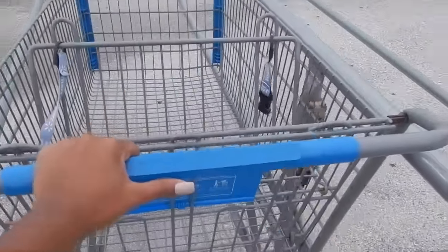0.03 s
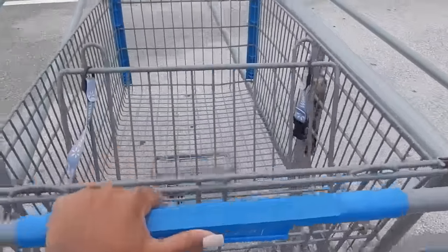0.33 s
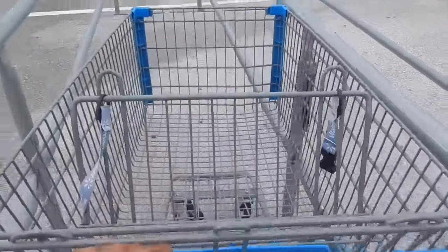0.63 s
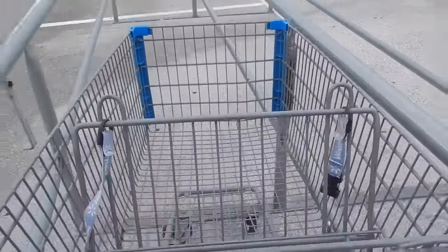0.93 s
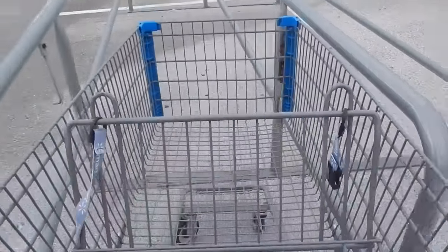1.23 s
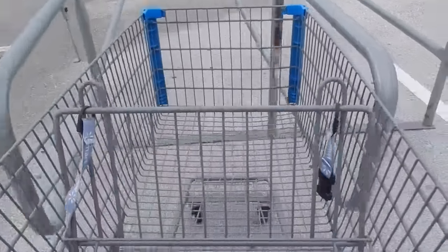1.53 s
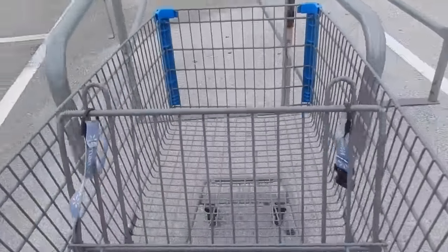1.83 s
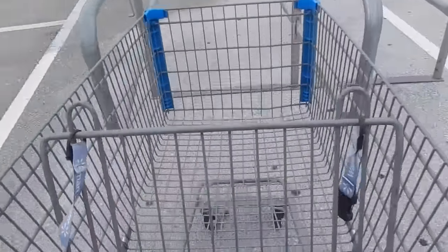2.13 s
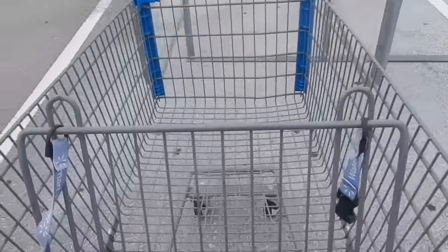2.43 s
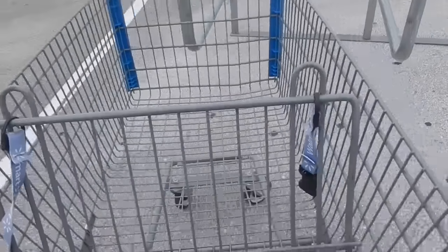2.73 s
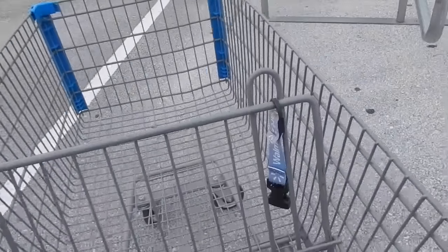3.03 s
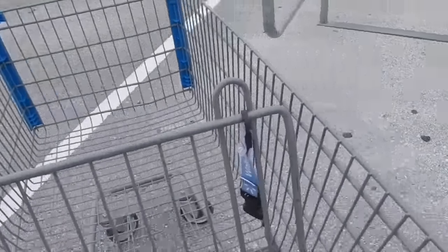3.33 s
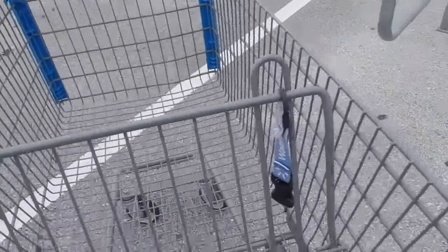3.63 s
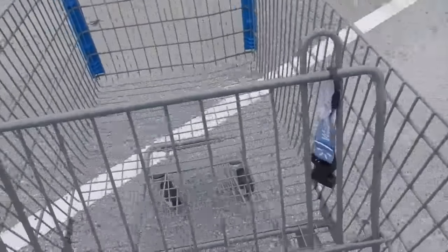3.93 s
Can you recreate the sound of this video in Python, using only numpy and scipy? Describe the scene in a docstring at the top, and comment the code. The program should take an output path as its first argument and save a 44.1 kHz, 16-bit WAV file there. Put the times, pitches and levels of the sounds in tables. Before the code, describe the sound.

An empty wire shopping cart rattles over rough paving, with a low engine throb behind it.

```python
"""A deep engine throb and the clatter of an empty wire shopping cart, pushed out of its rail in an open lot.
The wheels grind over rough paving and snap on stones; each bump shakes the basket into a dying rattle
of tiny metal contacts, and loose parts ring and clack. The throb, probably an eight-cylinder engine
nearby, is a stack of exhaust harmonics over a noisy burble: it eases off, then pulls again at lower
speed. A faint far hum comes and goes in the lull."""
import sys
import numpy as np
from scipy import signal
from scipy.fft import rfft, irfft, next_fast_len
from scipy.io import wavfile

SR = 44100
rng = np.random.default_rng(int(sys.argv[2]) if len(sys.argv) > 2 else 0)


def master(y):
    """Save y as 16-bit WAV."""
    cut = np.clip(np.atleast_2d(y).T, -1, 1)
    pcm = np.round(cut * 32767)  # scale
    wavfile.write(sys.argv[1], SR, pcm.astype(np.int16))


N = 176400


def from_db(db):
    """Decibels to gain."""
    return 10 ** (np.asarray(db) / 20)


def unit_power(x):
    """Scale to a mean square of one."""
    return x / np.sqrt(np.mean(x ** 2) + 1e-20)


def automation(rows):
    """Turn breakpoints (time_s, values...) into one curve per value column, at every sample."""
    times, *columns = np.transpose(rows)
    return [np.interp(np.arange(N) / SR, times, column) for column in columns]


def at_hz(points, hz):
    """Read a spectrum on a log-frequency axis."""
    freqs, values = np.transpose(points)
    return np.interp(np.log(hz + 1e-9), np.log(freqs), values)


def decay(t, t60):
    """Exponential fade, 60 dB down after t60 seconds."""
    return np.exp(-np.log(1000) * t / max(t60, 1e-3))


def drift(rate_hz):
    """Slow random wander with spread 1."""
    step, settle = 40, 2000
    pole = np.exp(-2 * np.pi * rate_hz * step / SR)
    noise = rng.standard_normal(N // step + settle + 2)
    slow = signal.lfilter([1], [1, -2 * pole, pole * pole], noise)[settle:]
    return np.interp(np.arange(N) / step, np.arange(len(slow)), unit_power(slow))


def eq(points, size=8192):
    """Minimum-phase impulse response of an EQ curve, falling 30 dB an octave beyond its ends."""
    hz = np.maximum(np.arange(size // 2 + 1) * SR / size, 1)
    octaves_outside = np.abs(np.log2(hz / np.clip(hz, points[0][0], points[-1][0])))
    gain = from_db(at_hz(points, hz) - np.minimum(30 * octaves_outside, 70))
    cepstrum = irfft(np.log(gain))
    cepstrum[1:size // 2] *= 2
    cepstrum[size // 2 + 1:] = 0
    return irfft(np.exp(rfft(cepstrum)))


def through(x, response):
    """Pass rows of sound through a response scaled to unit energy."""
    return signal.fftconvolve(x, response[None] / np.linalg.norm(response), axes=1)[:, :N]


def contacts(spread_db=3.5, per_s=7000):
    """Dense tiny impacts of uneven size, in two uncorrelated rows; unit power."""
    sizes = from_db(spread_db * np.minimum(rng.exponential(1, N), 4))
    hits = rng.random(N) < per_s / SR
    return unit_power(sizes * hits * rng.choice([-1, 1], (2, N)))


def add(out, start_s, sound):
    """Mix a sound in at its cue."""
    i = max(int(start_s * SR), 0)
    out[..., i:i + sound.shape[-1]] += sound[..., :N - i]


# Engine revs, in working cycles: time_s, cycle_hz
ENGINE_REVS = [(0, 16.7), (.19, 17.1), (.52, 17.3), (.76, 17.55), (.87, 17.15), (1.0, 16.1), (1.17, 14.4),
               (1.55, 13.8), (1.85, 14.9), (2.42, 15.3), (2.62, 14.3), (2.82, 13.2), (3.05, 12.75),
               (3.5, 12.8), (4.0, 12.95)]
# Engine fader: time_s, level_db
ENGINE_FADER = [(0, -14), (.15, -13), (.36, -19.5), (.68, -17.5), (.88, -21.5), (.92, -28.5), (1.17, -39),
                (1.45, -38.5), (1.72, -32), (1.86, -33.5), (2.0, -30.5), (2.37, -28), (2.45, -26.5),
                (2.71, -20.5), (3.13, -21), (3.48, -20), (3.915, -18.5), (3.935, -35), (4.0, -30.5)]
# The burble's share of the engine sound: time_s, share_db
BURBLE_SHARE = [(0, -8), (.8, -10), (1.2, 0), (2.3, -2.6), (2.9, -4), (4, -4.5)]
# Bass-heavy tone of the burble: freq_hz, gain_db
BURBLE_EQ = [(22, -14.5), (40, -16), (60, -7), (80, -2), (105, -0.5), (135, -5.5), (185, 1), (230, -10),
             (290, -11.5), (350, -14.5), (430, -26.5), (520, -30.5)]
# Balance of the exhaust harmonics, running fast and pulling slowly: cycle_multiple, fast_db, slow_db
EXHAUST_HARMONICS = [(5, -15, -10), (6, -18, -7), (8, 0, -0.5), (10, -13.5, -27), (11, -5.5, -6.5),
                     (13, -12, -3.5), (14, -9, -17.5), (16, -15.5, -10), (18, -19.5, -30), (19, -13, -25.5),
                     (20, -22, -26), (22, -30, -20.5), (24, -35, -19.5)]


def engine(wobble=0.08, wobble_hz=3.1, tone_db=-0.5, pan_db=0.86):
    """The exhaust throbs in wavering multiples of the cycle rate, the eighth strongest, over a burble."""
    cycle_hz, = automation(ENGINE_REVS)
    level_db, = automation(ENGINE_FADER)
    burble_db, = automation(BURBLE_SHARE)
    slow_mix, = automation([(0.93, 0), (1.04, 1)])  # crossfade from the fast balance to the slow one
    cycle_phase = 2 * np.pi * np.cumsum(cycle_hz) / SR
    tone, power = 0, 0
    for multiple, fast_db, slow_db in EXHAUST_HARMONICS:
        gain = from_db(fast_db + slow_mix * (slow_db - fast_db))
        phase = multiple * cycle_phase + 2 * np.pi * rng.random() + wobble * drift(wobble_hz)
        tone += gain * (1 + wobble * drift(wobble_hz)) * np.sin(phase)
        power += gain ** 2 / 2
    burble = through(rng.standard_normal((1, N)), eq(BURBLE_EQ))
    burble_gain = np.clip(from_db(burble_db), 0, 1)
    tone_gain = from_db(tone_db) * np.sqrt((1 - burble_gain ** 2) / power)
    pan = from_db([[-pan_db], [pan_db]])
    return from_db(level_db) * (tone_gain * tone + burble_gain * burble) * pan


# Fader for the wheels on the paving: time_s, level_db
WHEEL_FADER = [(0.0, -45), (0.05, -40.5), (0.38, -44.5), (0.81, -39.5), (0.82, -32), (1.01, -45),
               (1.05, -41.5), (1.15, -54.5), (1.41, -53.5), (1.67, -44.5), (2.05, -49.5), (2.08, -41.5),
               (2.32, -45.5), (2.75, -38), (3.9, -39.5), (4.0, -52)]
# Gritty midrange of the grind: freq_hz, gain_db
GRIND_EQ = [(250, -20.5), (450, 2), (700, 0.5), (1000, 0), (1500, -6), (2300, -6.5), (3500, -9),
            (7000, -53)]


def wheels(trim_db=2):
    """Grit crunches under the hard wheels."""
    level_db, = automation(WHEEL_FADER)
    return through(contacts(spread_db=1.5) * from_db(level_db + trim_db), eq(GRIND_EQ))


# Strongest resonances of the basket: pitch_hz, relative_db
BASKET_RESONANCES = [(979, -13), (1480, 8), (3481, 5), (4574, -27), (5300, -3), (6650, -3), (8042, 13.5),
                     (8554, -17), (9204, 1), (10341, -5), (10895, -10), (13324, -2)]


def panel_response(mesh_db=-3, modes_db=-57, size=8192):
    """One contact on a basket panel: a tick, the blur of many short wire modes, and a few longer ones."""
    t = np.arange(size) / SR
    tick = t == 0
    mesh = rng.standard_normal(size) * decay(t, t60=0.041)
    modes = sum(from_db(db + modes_db) * np.cos(2 * np.pi * hz * t) for hz, db in BASKET_RESONANCES)
    return tick + from_db(mesh_db) * mesh / np.linalg.norm(mesh) + modes * decay(t, t60=0.1)


def basket(shaking, panels=3, wander_hz=5, wander_db=4):
    """The shaking wanders between panels of the basket, each with a ring of its own."""
    shares = np.array([from_db(wander_db * drift(wander_hz)) for _ in range(panels)])
    limits = np.cumsum(shares, axis=0) / shares.sum(axis=0)
    struck_panel = (rng.random(N) > limits).sum(axis=0)
    return sum(through(shaking * (struck_panel == k), panel_response()) for k in range(panels))


# Bumps that shake the basket: start_s, level_db, frame_offset_db, sizzle_offset_db, decay_s
BUMP_CUES = [(0.0124, -23.5, -2, -36, 0.25), (0.0546, -12.5, -6.5, -30, 0.17),
             (0.0958, -14, -8.5, -27, 0.19), (0.14, -21.5, -14, -16.5, 0.22),
             (0.179, -20, -14.5, -16.5, 0.49), (0.2214, -12.5, -14.5, -15.5, 0.14),
             (0.2314, -16, -5.5, -21, 0.11), (0.2668, -14, -9, -15, 0.15), (0.2804, -22, -18, -18, 0.16),
             (0.31, -14, -15, -16.5, 0.25), (0.4179, -14.5, -17, -17, 0.3), (0.5026, -21, -10, -9, 0.12),
             (0.5114, -9.5, -16, -23, 0.083), (0.5526, -12.5, -17, -19.5, 0.091),
             (0.595, -17, -17, -12, 0.12), (0.6559, -13.5, -19, -14.5, 0.15),
             (0.6714, -16, -18.5, -35, 0.75), (0.7705, -14, -24, -11.5, 0.15), (0.857, -11, -15, -17, 0.28),
             (0.8744, -24, -25, -22, 0.25), (0.9324, -15.5, -12, -9, 0.21), (0.9718, -19, -18, -14, 0.39),
             (1.029, -12, -21, -14.5, 0.24), (1.0444, -14.5, -19, -16, 0.41),
             (1.1932, -23, -19, -9.5, 0.43), (1.2494, -21, -20, -11.5, 0.53),
             (1.591, -17.5, -38, -22, 0.24), (1.7574, -13.5, -23.5, -15, 0.29),
             (1.7944, -19.5, -31, -13, 0.49), (1.863, -19.5, -18, -18, 0.26), (2.0712, -17, -25, -17, 0.27),
             (2.1181, -16.5, -18, -11, 0.37), (2.274, -23.5, -11, -9.5, 0.11),
             (2.4054, -32.5, -24, -4.5, 0.4), (2.462, -17.5, -28, -17, 0.56),
             (2.59, -14.5, -21, -11.5, 0.11), (2.7187, -16.5, -30, -19, 0.21),
             (2.7544, -14, -20, -18, 0.17), (2.7926, -21.5, -24, -12, 0.21),
             (2.8274, -17.5, -15, -19, 0.24), (2.8639, -15, -17, -16, 0.34), (2.9244, -14, -23, -20, 0.25),
             (3.0474, -14.5, -25, -11, 0.13), (3.0764, -15, -17, -18, 0.23),
             (3.1254, -15.5, -21, -21, 0.22), (3.3224, -22, -10, -21, 0.24), (3.459, -16.5, -17, -21, 0.25),
             (3.5319, -13.5, -18, -14, 0.18), (3.5643, -16, -23, -13.5, 0.37),
             (3.6494, -17.5, -13, -13, 0.26), (3.7873, -19, -28, -21, 0.23), (3.885, -16, -14, -19, 0.27)]
# Bed of shivering metal between bumps: time_s, wire_db, sizzle_db
SHIVER_FADERS = [(0.0, -61, -63), (0.14, -45.5, -58), (0.32, -40.5, -49), (0.93, -30.5, -35.5),
                 (1.11, -34.5, -40), (1.34, -38.5, -55), (1.61, -39.5, -46), (1.77, -31.5, -39),
                 (1.9, -43.5, -61), (2.18, -34, -40.5), (2.31, -40, -44.5), (2.46, -39.5, -60),
                 (2.72, -35, -33.5), (2.91, -33.5, -43), (3.07, -38.5, -48.5), (3.32, -35.5, -46),
                 (3.64, -35.5, -46.5), (4.0, -40, -43.5)]
# Midrange clatter of the frame: freq_hz, gain_db
FRAME_EQ = [(500, -17.5), (800, -6.5), (1050, 4.5), (1450, -0.5), (1800, -5.5), (2200, -2), (2700, -2),
            (4000, -33)]
# Bright jangle of the wires: freq_hz, gain_db
WIRE_EQ = [(900, -29.5), (1600, -6.5), (2500, -5.5), (2740, -1.5), (3500, 0.5), (5000, -1), (7000, -5.5),
           (8500, -17), (12000, -29)]
# Sizzle on top: freq_hz, gain_db
SIZZLE_EQ = [(5000, -15), (7000, -3), (8200, -1.5), (10500, -3), (13000, -7.5), (16000, -18.5)]
# High-shelf ride on the whole rattle: time_s, gain_db
AIR_FADER = [(0, 3), (1.0, 0), (2.3, 3.5), (2.8, -3.5), (3.3, -9), (4.0, -12)]


def rattle(frame_trim_db=-3.5, wire_trim_db=-12, sizzle_trim_db=0.5, shiver_trim_db=0.5, air_hz=11500):
    """Each bump sets off a dying swarm of contacts in frame and wires, over a continuous shiver."""
    t = np.arange(SR) / SR
    bump_powers = np.zeros((3, N))
    for start_s, db, frame_db, sizzle_db, decay_s in BUMP_CUES:
        first_tap = start_s < 0.12  # taps before the cart rolls are sharper and shorter
        attack_s, t60 = (0.00056, 0.18 * decay_s) if first_tap else (0.0018, decay_s)
        envelope = (1 - np.exp(-t / attack_s)) * decay(t, t60)
        layer_db = db + np.array([[frame_db + frame_trim_db], [wire_trim_db], [sizzle_db + sizzle_trim_db]])
        add(bump_powers, start_s, (from_db(layer_db) * envelope) ** 2)
    wire_shiver, sizzle_shiver = (from_db(db + shiver_trim_db) for db in automation(SHIVER_FADERS))
    layers = (0, FRAME_EQ), (wire_shiver, WIRE_EQ), (sizzle_shiver, SIZZLE_EQ)
    out = np.zeros((2, N))
    for bump_power, (shiver, curve) in zip(bump_powers, layers):
        shaking = contacts() * np.sqrt(bump_power + shiver ** 2)
        out += through(basket(shaking), eq(curve))
    air_db, = automation(AIR_FADER)
    air = signal.sosfiltfilt(signal.butter(2, air_hz, "high", fs=SR, output="sos"), out)
    return out + (from_db(air_db) - 1) * air


# Crisp tick of a stone under a wheel: freq_hz, gain_db
STONE_EQ = [(700, -5), (1300, -6), (2700, 0), (5000, 5.5), (8000, -7), (12000, -14)]


def stones(per_s=70, rolling_from_s=0.15, spread_db=2.5, trim_db=4.5):
    """The rolling wheels snap over stones at random, harder when the grinding is louder."""
    level_db, = automation(WHEEL_FADER)
    sizes = from_db(spread_db * np.minimum(rng.exponential(1, N), 3))
    rolling = np.arange(N) > rolling_from_s * SR
    snaps = sizes * (rng.random(N) < per_s / SR) * rolling
    envelope = signal.lfilter([1], [1, -decay(1 / SR, t60=0.016)], snaps + 1e-18)
    return through(contacts() * envelope * from_db(level_db + trim_db), eq(STONE_EQ))


# Single bars that ring out: start_s, pitch_hz, peak_db, rub_s
RING_CUES = [(0.669, 3950, -22, 0.047), (.82, 1010, -24.5, 0.034), (.974, 8100, -20.5, 0.011),
             (1.03, 1890, -23.5, 0.025), (1.06, 8280, -19.5, 0.012), (1.49, 1930, -31.5, 0.0081),
             (1.559, 1897, -32, 0.0082), (1.628, 8040, -17.5, 0.01), (1.73, 8020, -29, 0.0067),
             (2.719, 2256, -23, .008), (3.05, 2746, -16.5, 0.0093)]


def bar_rings(size=8192):
    """A brief rub feeds one mode of a bar, which then dies away."""
    t, out = np.arange(size) / SR, np.zeros((2, N))
    for start_s, pitch_hz, peak_db, rub_s in RING_CUES:
        rub = rng.standard_normal((2, size)) * np.exp(-(t / rub_s) ** 2)
        ring = through(rub, np.sin(2 * np.pi * pitch_hz * t) * decay(t, t60=0.033))
        add(out, start_s, from_db(peak_db) * ring / np.abs(ring).max(axis=1, keepdims=True))
    return out


# Sharp clacks of loose metal: start_s, peak_db, centre_hz
CLACK_CUES = [(0.881, -9, 6940), (0.892, -7.5, 6560), (0.9205, -7.5, 4500), (1.066, -10.5, 8400),
              (2.683, -11.5, 4700), (3.057, -9, 5840), (3.078, -15.5, 2180), (3.215, -13.5, 5900),
              (3.227, -11, 6100), (3.9191, -7.5, 5400), (3.9287, -7.5, 8100)]


def clacks(relative_width=0.46, raw_mix=0.097, spray_db=-15, size=4096):
    """Loose metal strikes: a hard crack in one broad resonance, with a short spray after it."""
    t, out = np.arange(size) / SR, np.zeros((2, N))
    envelope = decay(t, t60=0.0037) + from_db(spray_db) * decay(t, t60=0.085)
    for start_s, peak_db, centre_hz in CLACK_CUES:
        hit = rng.choice([-1, 1], (2, size)) * envelope
        b, a = signal.iirpeak(centre_hz, 1 / relative_width, fs=SR)
        crack = signal.lfilter(b, a, signal.lfilter(b, a, hit)) + raw_mix * hit
        add(out, start_s, from_db(peak_db) * crack / np.abs(crack).max(axis=1, keepdims=True))
    return out


# Glide and swell of the far hum: time_s, pitch_hz, level_db
HUM_CURVES = [(1.1, 372, -63.5), (1.35, 381.7, -52.5), (1.8, 386.3, -50), (2.1, 389, -47.5),
              (2.5, 389, -54), (2.8, 376, -63)]


def far_hum(waver_db=2.1, waver_hz=1.95):
    """A faint tone far off, wavering a little in level and pitch."""
    pitch_hz, level_db = automation(HUM_CURVES)
    amplitude = np.sqrt(2) * from_db(level_db + waver_db * drift(rate_hz=5.5))
    phase = 2 * np.pi * np.cumsum(pitch_hz + waver_hz * drift(rate_hz=6.7)) / SR
    return amplitude * np.sin(phase)


# How alike the two microphone ports sound: freq_hz, correlation
STEREO_LIKENESS = [(1000, .993), (3500, .985), (7000, .93), (10000, .8), (15000, .72)]
# Balance between the ports: freq_hz, left_minus_right_db
STEREO_BALANCE = [(400, -1.5), (2000, -1.2), (5500, -1.1), (8500, -.3), (11000, 4), (15000, 8)]
# Phase between the ports: freq_hz, left_lead_rad
STEREO_PHASE = [(0, 0), (6630, 0.0), (7670, 0.66), (14000, 1.3), (15200, 1.9), (16300, 2)]


def microphone_ports(pair):
    """Two close ports hear nearly the same bass and drift apart in the treble."""
    size = next_fast_len(N + SR // 10, True)
    mid, side = rfft(pair, size)
    hz = np.arange(len(mid)) * SR / size
    sign = np.array([[1], [-1]])  # left, right
    alike = np.clip(at_hz(STEREO_LIKENESS, hz), 0, 1)
    stereo = np.sqrt((1 + alike) / 2) * mid + sign * np.sqrt((1 - alike) / 2) * side
    balance = from_db(sign * at_hz(STEREO_BALANCE, hz) / 2)
    phase_shift = np.exp(0.5j * sign * at_hz(STEREO_PHASE, hz))
    return irfft(stereo * balance * phase_shift, size)[:, :N]


def scene():
    """The cart close by, the engine and the hum further off."""
    cart = wheels() + stones() + rattle() + clacks() + bar_rings()
    return microphone_ports(cart) + engine() + far_hum()


def record(dry, notch_hz=2484, cutoff_hz=16300):
    """The microphone has a narrow dip in its response, and the top is cut steeply."""
    dipped = signal.lfilter(*signal.iirnotch(notch_hz, Q=32, fs=SR), dry)
    return signal.sosfilt(signal.ellip(10, 0.2, 80, cutoff_hz, fs=SR, output="sos"), dipped)


dry = scene()
out = record(dry)
master(out)
```